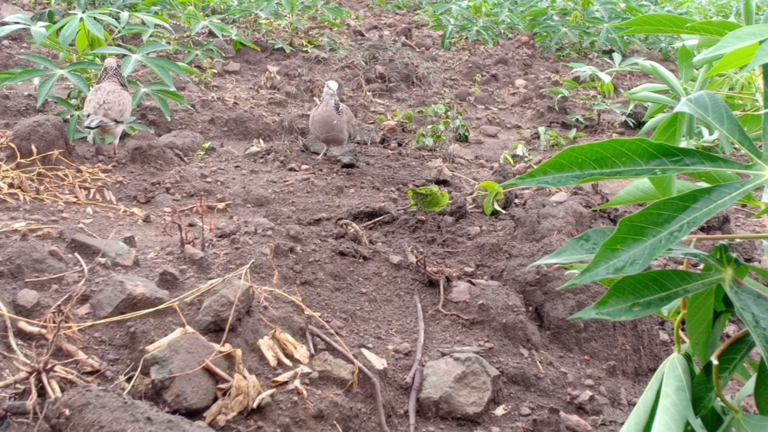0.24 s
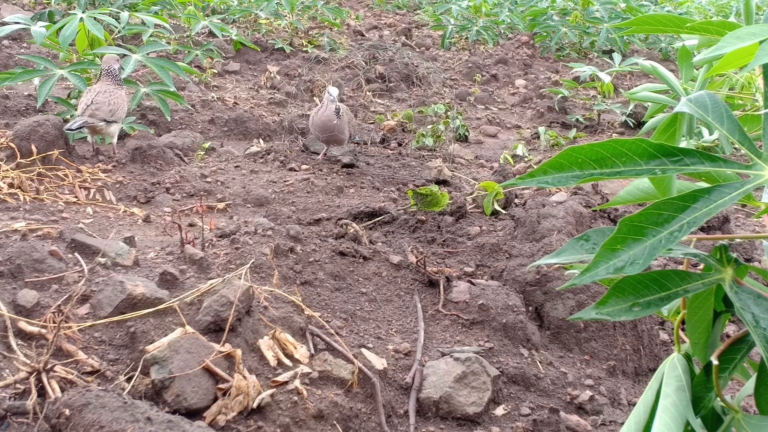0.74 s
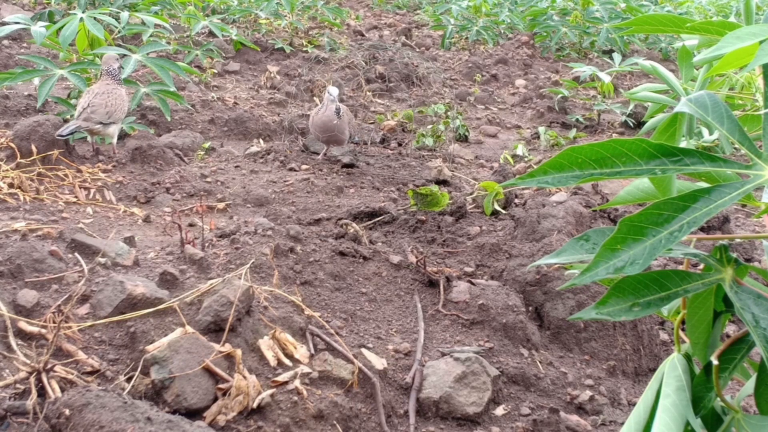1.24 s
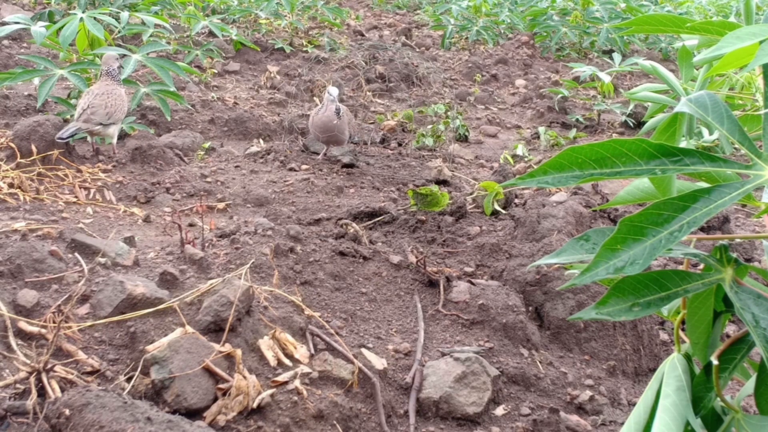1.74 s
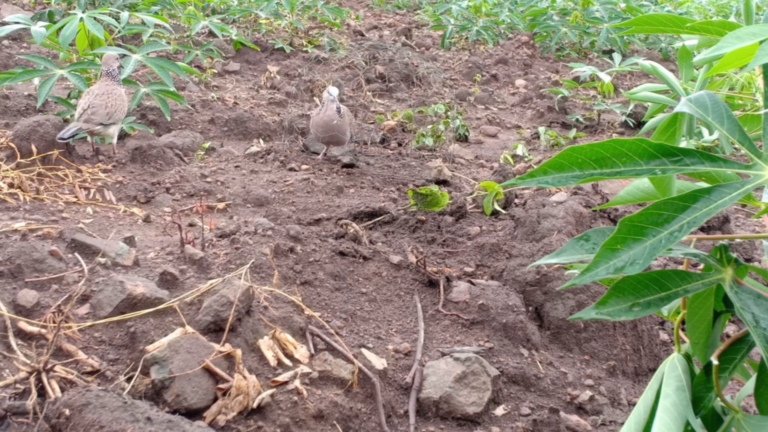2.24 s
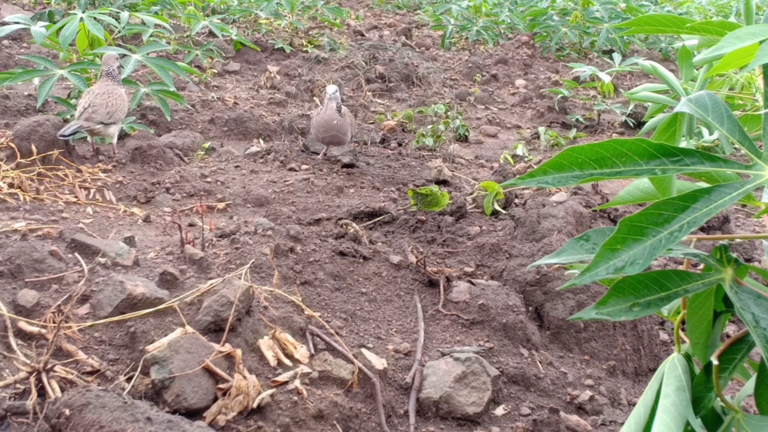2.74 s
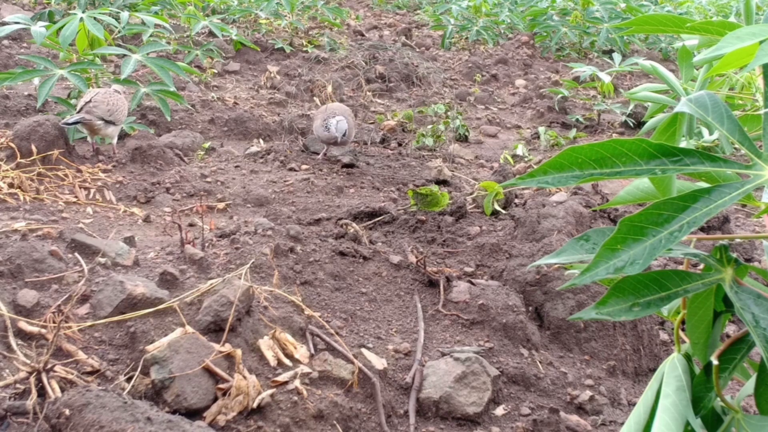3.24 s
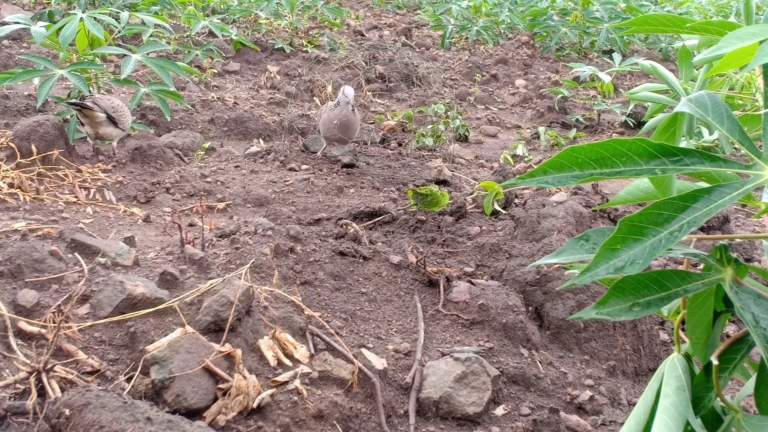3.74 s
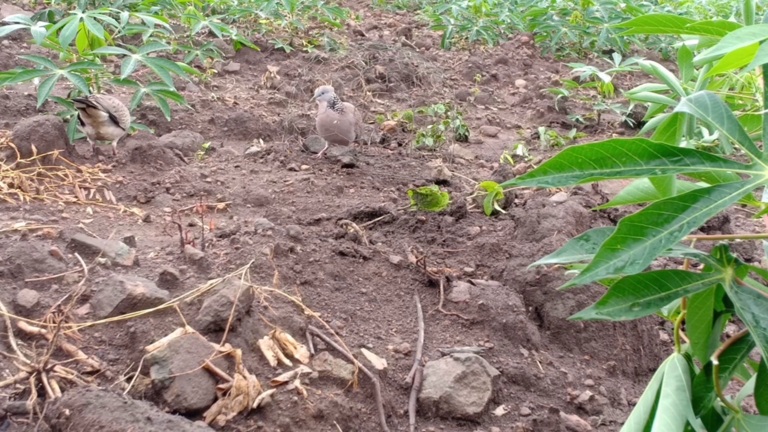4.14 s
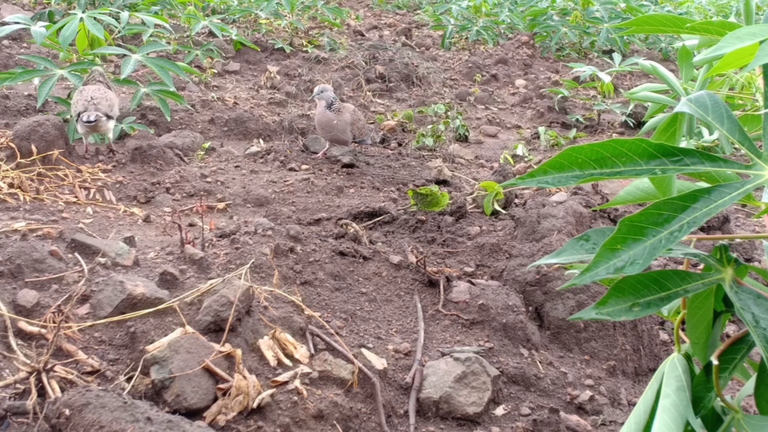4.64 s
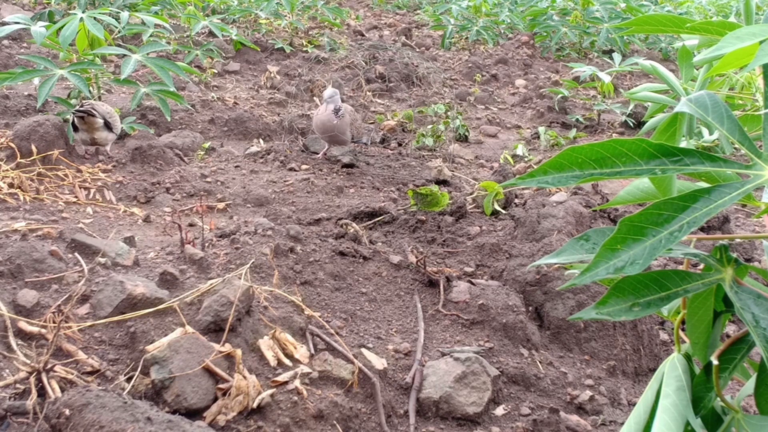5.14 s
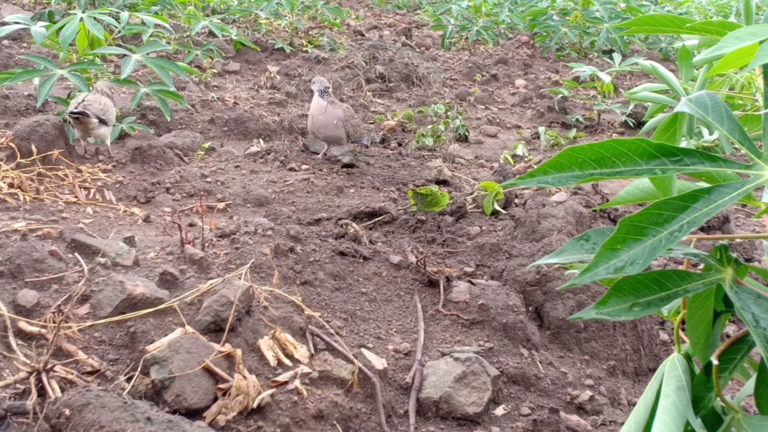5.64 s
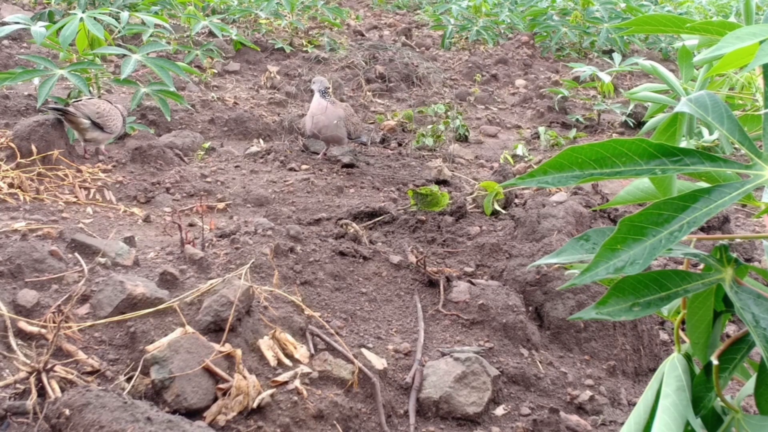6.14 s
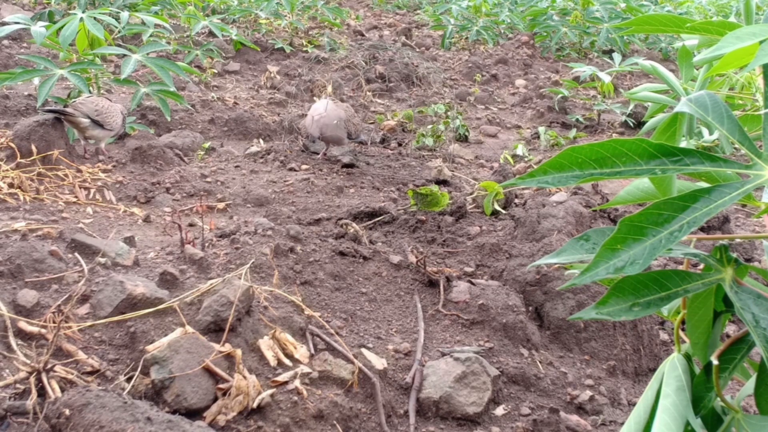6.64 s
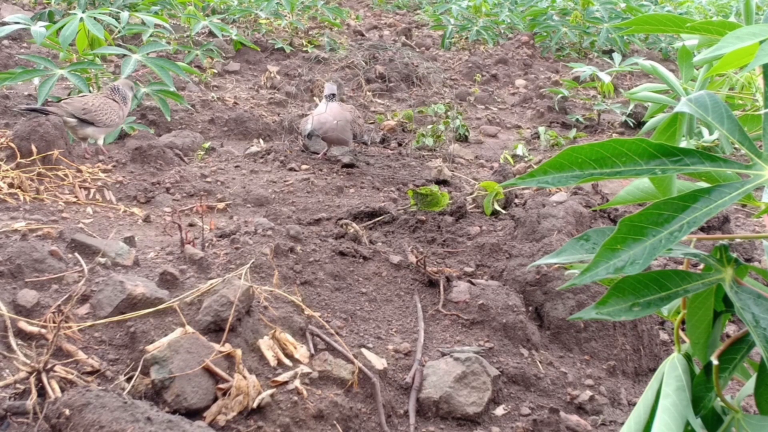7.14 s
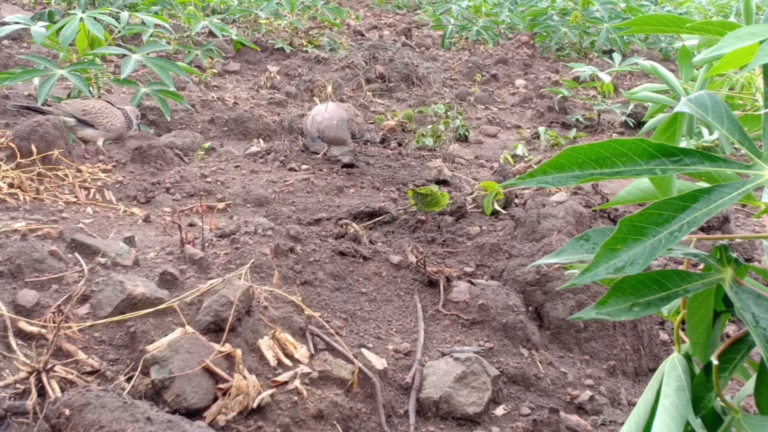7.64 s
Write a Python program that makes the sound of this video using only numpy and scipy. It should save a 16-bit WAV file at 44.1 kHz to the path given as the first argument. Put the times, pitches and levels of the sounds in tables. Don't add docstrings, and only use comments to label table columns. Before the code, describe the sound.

A dove a few metres away coos in purring short-long pairs over a quiet field, with falling chirps, high trills and faint insect rasps behind.

```python
import sys
import numpy as np
from scipy import signal
from scipy.fft import rfft, irfft
from scipy.io import wavfile
from scipy.ndimage import uniform_filter1d

SR = 44100
rng = np.random.default_rng(int(sys.argv[2]) if len(sys.argv) > 2 else 0)


def gain_from_decibels(decibels):
    exponent = np.asarray(decibels, float) / 20
    return 10 ** exponent


def generate_wav(sig):
    pcm = np.round(np.clip(np.atleast_2d(sig).T, -1, 1) * 32767).astype(np.int16)
    wavfile.write(sys.argv[1], SR, pcm)


N = 347949
t = np.arange(N) / SR


def band(x, lo_hz, hi_hz, order=2):
    return signal.sosfilt(signal.butter(order, [lo_hz, hi_hz], "band", fs=SR, output="sos"), x)


def unit(x):
    return x / np.sqrt(np.mean(x ** 2))


def walk(rate):
    hold = int(SR / rate)
    steps = np.repeat(rng.standard_normal(N // hold + 1), hold)
    return unit(uniform_filter1d(uniform_filter1d(steps, hold), hold)[:N])


def add(out, start, tone, pan_db, lead=0.):
    for ch, sign in enumerate((1, -1)):
        i = max(int((start - sign * lead / 2) * SR), 0)
        out[ch, i:i + len(tone)] += (tone * gain_from_decibels(sign * pan_db / 2))[:N - i]


def glide(s, hz, db):
    u = np.arange(s[0], s[-1], 1 / SR)
    phase = 2 * np.pi * np.cumsum(np.interp(u, s, hz)) / SR
    return np.sqrt(2) * gain_from_decibels(np.interp(u, s, db)) * np.sin(phase)


def leaves(x, t60, db):
    u = t[:SR // 2]
    tail = rng.standard_normal((2, len(u)))
    tail = tail * gain_from_decibels(2.3 * rng.standard_normal((2, len(u))))
    tail *= gain_from_decibels(-60 * u / t60) * (u > .004)
    tail /= np.sqrt(np.sum(tail ** 2, axis=1, keepdims=True))
    return x + gain_from_decibels(db) * signal.fftconvolve(x, tail, axes=1)[:, :N]


def soft_notes(notes, pan_db):
    out = np.zeros((2, N))
    for start, end, first_hz, last_hz, db in notes:
        share = np.array([0, .2, .8, 1])
        hz = first_hz + (last_hz - first_hz) * share
        add(out, start, glide((end - start) * share, hz, db + np.array([0.0, 2.5, 3.5, -14.5])), pan_db)
    return out


def coo_controls():
    # start in seconds, length in seconds, level in dB, first and last crop resonance in Hz.
    short_coos = [
        (3.716, 0.21, -32.5, 668, 617),
        (4.846, 0.22, -31, 655.6, 672.6),
        (6.058, 0.221, -31, 656, 659),
        (7.266, 0.21, -31.5, 657.5, 650),
    ]
    # start in seconds, length in seconds, level in dB, crop resonance in Hz,
    # seconds after the start at which the purr quickens.
    long_coos = [
        (-.29, 0.5, -30.5, 669, 0.13),
        (4.052, 0.52, -31, 661.7, 0.15),
        (5.185, .528, -31.5, 668.3, .15),
        (6.39, 0.49, -32, 668, .16),
        (7.589, 0.48, -32, 663.6, 0.085),
    ]
    # share of the length, level in dB, resonance shift in Hz.
    short_shape = [(0, -21.5, 0), (0.089, -1, 2.5), (.35, 0, 6.5), (.9, -1, -0.5), (0.998, -15, -20)]
    # share of the length, level in dB, resonance shift in Hz.
    long_shape = [(0, -17.5, -4.5), (.045, 0.5, 0.5), (0.148, 0, 4), (0.661, 0, -4.5), (.74, -0.5, -32),
                  (.88, -3.5, -51.5), (.965, -7, -63), (0.999, -8.5, -61)]
    short_purr_hz, slow_purr_hz, fast_purr_hz, quicken_s = 96.45, 67.66, 110.24, 0.094

    share, shape_db, shift = np.transpose(short_shape)
    for start, length, db, first_hz, last_hz in short_coos:
        s = start + length * share
        crop_hz = np.interp(t, s, first_hz + (last_hz - first_hz) * share + shift)
        yield s, np.interp(t, s, db + shape_db), crop_hz, short_purr_hz + 0 * t
    share, shape_db, shift = np.transpose(long_shape)
    for start, length, db, hz, quickens in long_coos:
        s = start + length * share
        rate = np.interp(t - start - quickens, [-quicken_s / 2, quicken_s / 2], [slow_purr_hz, fast_purr_hz])
        yield s, np.interp(t, s, db + shape_db), np.interp(t, s, hz + shift), rate


def dove():
    # middle in seconds, length in seconds, strength from 0 to 1.
    clear_moments = [(.035, .1, .85), (3.895, .03, .5), (4.295, .02, .9), (4.385, .038, 1),
                     (5.025, .06, .7), (5.355, .03, .6), (5.44, .022, .7), (5.475, .035, .9),
                     (5.54, .05, 1), (6.24, .04, .7), (6.572, .022, .7), (6.622, .05, .9),
                     (6.668, .022, .7), (7.44, .04, .7), (7.812, .035, .75), (7.87, .075, 1)]
    clear_db, clear_edge_s, clear_narrows, clear_wander_hz = 3, 0.0074, 0.34, 16
    crop_width_hz, between_lines = 56.9, .55
    scoop_hz, short_sag_hz, long_sag_hz, pitch_wander_hz = 190, 90, 20, 4
    purr_jitter, purr_stumble, pulse_rise, pulse_scatter_db = 0.1267, .06, .2, .7
    skirt_db, skirt_fall_db, skirt_tilt_db, short_skirt_db = -18, 6.5, .5, 6
    breath_db = -34.5

    out = np.zeros((2, N))
    wobble, drift, slip = walk(120), walk(140), walk(70)
    wander, stumble, scatter = walk(50), walk(45), walk(80)
    breath = unit(band(rng.standard_normal(N), 680, 930))
    flicker = np.array([walk(130) for _ in range(8)])
    clearing = np.zeros(N)
    for middle, length, strength in clear_moments:
        clearing += strength * np.clip((length / 2 - abs(t - middle)) / clear_edge_s + .5, 0, 1)
    clearing = np.clip(clearing, 0, 1)

    for s, *controls in coo_controls():
        i = slice(max(int(s[0] * SR), 0), min(int(s[-1] * SR), N))
        db, crop_hz, rate, clear = (c[i] for c in (*controls, clearing))
        since, until = t[i] - s[0], s[-1] - t[i]
        short = s[-1] - s[0] < .3
        centre = -between_lines * (1 - clear)
        width = crop_width_hz / rate * (1 - clear_narrows * clear)
        hz = crop_hz - centre * rate - scoop_hz * np.exp(-since / .014)
        hz -= (short_sag_hz if short else long_sag_hz) * np.exp(-until / .01)
        hz += 8 * drift[i] + (pitch_wander_hz + clear_wander_hz * clear) * wander[i]
        top = 2 * np.pi * np.cumsum(hz) / SR
        uneven_rate = rate * (1 + purr_jitter * wobble[i] + purr_stumble * stumble[i])
        purr = 2 * np.pi * (np.cumsum(uneven_rate) / SR + 0.29)
        k = np.arange(-4, 4)[:, None]
        share = np.exp(-(k - centre - .12 * slip[i]) ** 2 / (2 * (1.25 * width - .06) ** 2))
        skirt = skirt_db - skirt_fall_db * abs(k - centre) * rate / 100
        skirt = skirt + short_skirt_db * short - skirt_tilt_db * k
        share = (share + gain_from_decibels(skirt)) * (1 + .18 * flicker[:, i])
        beat = np.sum(share * np.exp(1j * k * (purr - pulse_rise * k)), axis=0)
        beat /= np.sqrt(np.sum(share ** 2, axis=0))
        beat *= 2.52 * np.tanh(abs(beat) / 1.156) / (abs(beat) + 1e-9)
        voice = np.imag(beat * np.exp(1j * top)) + gain_from_decibels(breath_db) * breath[i] * abs(beat)
        soft = np.clip(np.minimum(since / .004, until / .01), 0, 1)
        level = gain_from_decibels(db + clear_db * clear + pulse_scatter_db * scatter[i])
        add(out, max(s[0], 0), voice * level * soft, -5)
    return leaves(band(out, 410, 1700, order=3), 0.38, -20)


def air():
    # frequency in
    # Hz, level in dB per Hz.
    air_colour = [(20, -26), (50, -22.5), (120, -14.5), (250, -19.5), (600, -18.5), (1100, -25.5),
                  (1600, -24.5), (2600, -21.5),
                  (4000, -33), (5300, -31.5), (6100, -28.5), (7200, -40.5), (9500, -44.5), (13000, -40.5),
                   (15400, -47)]
    # time in seconds, level in dB.
    twitter_levels = [
        (0.0, -70.5),
        (1.71, -68.5),
        (4.88, -78),
        (7.34, -63.5),
        (7.89, -68),
    ]
    hz = np.fft.rfftfreq(N, 1 / SR) + 1
    colour_hz, colour_db = np.transpose(air_colour)
    colour = gain_from_decibels(np.interp(np.log(hz), np.log(colour_hz), colour_db))
    like = 0.49 / (1 + (hz / 450) ** 3)
    mid, side = rfft(rng.standard_normal((2, N))) * colour
    hush = irfft(mid * np.sqrt(1 + like) + side * np.sqrt(1 - like) * np.array([[1], [-1]]), N)
    twitter = np.zeros((2, N))
    for lo_hz in (1890, 2190, 2400, 2660, 3000):
        voices = unit(band(rng.standard_normal((2, N)), lo_hz, lo_hz * 1.12))
        twitter += voices * gain_from_decibels(3.4 * walk(20))
    twitter_db = np.interp(t, *np.transpose(twitter_levels)) - 10 + np.array([[-2], [2]])
    return unit(hush) * gain_from_decibels(-61.5 + np.array([[-1], [1]])) + twitter * gain_from_decibels(twitter_db)


def cricket():
    # start in seconds, end in seconds, level in dB.
    bursts = [(0.104, .2, -76), (0.427, 0.546, -75), (0.741, .83, -75), (1.226, 1.4, -78),
              (1.574, 1.672, -76.5), (2.464, 2.61, -76.5), (2.793, 2.91, -73), (3.13, 3.327, -75),
              (3.503, 3.6, -75), (3.844, 3.94, -75), (4.42, 4.566, -76.5), (4.732, 4.832, -76),
              (5.289, 5.437, -76), (5.644, 5.714, -75.5), (5.918, 6.038, -76.5), (6.407, 6.606, -76),
              (6.74, 6.86, -75.5), (7.1, 7.2, -73), (7.424, 7.537, -73.5)]
    throb = 1 + 0.16 * np.sin(2 * np.pi * 65 * t)
    rasp = unit(band(rng.standard_normal(N), 4780, 5000) * throb)
    gate = np.zeros(N)
    for start, end, db in bursts:
        edges = [start - .015, start + .015, end - .015, end + 0.026]
        gate += gain_from_decibels(db) * np.interp(t, edges, [0, 1, 1, 0])
    return rasp * gate * gain_from_decibels(np.array([[-2.5], [2.5]]))


def run_of(first, last, gap, db):
    s = np.linspace(first, last, max(round((last - first) / gap), 1) + 1)
    return list(zip(s, db + 1.4 * rng.standard_normal(16)[:len(s)]))


def warble(notes, hz, sweep_hz, length, pan_db):
    out = np.zeros((2, N))
    for start, peak_db in notes:
        force = np.clip((peak_db + 67.5) / 12, .2, 1)
        s = length * (1 + force) * np.array([0, .3, .7, 1])
        pitch_hz = hz + sweep_hz * force * np.array([1.0, .4, -0.51, -2.4])
        note_db = peak_db - 5.5 + np.array([-12.5, -1.0, -2.5, -27.5])
        add(out, start - .006, glide(s, pitch_hz, note_db), pan_db, lead=.0006)
    return out


def warbler():
    # first quick note, first loud note and last loud note in seconds, level in dB.
    songs = [
        (.338, .768, .9987, -55),
        (2.4157, 2.745, 2.9762, -54.5),
        (4.2377, 4.615, 4.8476, -54),
        (6.0087, 6.4293, 6.6483, -54.5),
    ]
    # first note and last note in seconds, level in dB.
    far_runs = [(.11, .2, -63), (1.115, 1.52, -62), (1.91, 1.98, -63), (2.32, 2.41, -62.5),
                (3.19, 3.47, -61.5), (3.58, 3.68, -63), (3.914, 4, -63), (5.009, 5.096, -65),
                (5.253, 5.545, -62), (5.925, 5.99, -65), (6.7, 6.77, -65), (7.06, 7.15, -63.5),
                (7.279, 7.34, -66), (7.476, 7.86, -62)]
    quick_gap_s, quick_db, break_s, far_gap_s = .046, -5.5, .055, .066
    near, far = [], []
    for first, loud, last, db in songs:
        near += run_of(first, loud - break_s, quick_gap_s, db + quick_db)
        near += [(s, db) for s in np.linspace(loud, last, 4)]
    for first, last, db in far_runs:
        far += run_of(first, last, far_gap_s, db)
    far = warble(far, 5850, 800, .026, -4) * gain_from_decibels(-5.5 + 4 * walk(400))
    return leaves(warble(near, 6013, 330, .013, -14.0), 0.15, -5.5) + leaves(far, 0.19, 7.9)


def chirper():
    # seconds from onset, pitch in Hz, level in dB.
    chirp_shape = [(-.013, 3300, -19), (-.006, 2950, -6), (.003, 2680, -1), (.019, 2290, 0),
                   (.03, 1960, -13), (.042, 1680, -14), (.06, 1645, -13), (.072, 1635, -32)]
    # time in seconds, peak in dB, left minus right in dB, strength of the low end in dB.
    chirps = [(0.2625, -47, -3, -7), (0.601, -47.5, -8, -2.5), (0.9348, -44, -7, -2),
              (1.259, -41.5, -7, -6), (1.5877, -42.5, -4, -1.5), (1.9222, -40.5, -6.5, -6.5),
              (3.695, -53.5, -2, -6), (4.0613, -55.5, -4.5, -4), (5.642, -56.5, -4.5, -2),
              (5.965, -51, -8.5, 1.5), (6.2856, -43.5, -7.5, 1.5), (6.6158, -45.5, -8, 4),
              (6.952, -43, -5, 2), (7.2882, -44.5, -6, 2)]
    out = np.zeros((2, N))
    s, hz, db = np.transpose(chirp_shape)
    for start, peak_db, pan_db, low_db in chirps:
        chirp = glide(s, hz, peak_db - 1.5 + db + low_db * (hz < 1800))
        add(out, start + s[0], chirp, pan_db, lead=0.0005)
    return leaves(out * gain_from_decibels(2.2 * walk(150) - 1), .33, -1.5)


def far_doves():
    # start in seconds, end in seconds, first pitch in Hz, last pitch in Hz, level in dB.
    far_coos = [
        (.4, 0.536, 536, 436, -64),
        (.56, .63, 508, 475, -69),
        (.8, 1.01, 808, 738, -77.5),
        (2.55, 2.63, 492, 526, -74),
        (4.79, 4.891, 482, 534, -66.5),
        (5.09, 5.221, 543, 466, -66),
        (5.73, 5.89, 493, 444, -71.5),
    ]
    return leaves(soft_notes(far_coos, -5), .25, -4)


def whistlers():
    # start in seconds, end in seconds, first pitch in Hz, last pitch in Hz, level in dB. # The first
    whistles = [(2.653, 2.703, 2950, 1850, -69.5), (2.81, 2.87, 3800, 3480, -75.5),
                (3.012, 3.053, 2950, 1820, -66), (3.356, 3.412, 2950, 1790, -67),
                (.7, 0.742, 3100, 3330, -71), (1.091, 1.174, 3200, 3430, -70.5),
                (1.322, 1.35, 3600, 3460, -76), (1.44, 1.582, 3185, 3156, -66),
                (1.706, 1.768, 3145, 2955, -67), (2.072, 2.099, 2400, 2400, -64.5),
                (2.198, 2.364, 3350, 3420, -82), (2.261, 2.327, 2920, 2860, -71),
                (2.584, 2.703, 3560, 3190, -74), (2.963, 3.175, 3000, 3050, -66.5),
                (3.16, 3.26, 3000, 3000, -75), (3.26, 3.38, 3390, 2850, -72),
                (3.464, 3.611, 2720, 2887, -71), (3.76, 3.825, 2450, 2505, -72),
                (3.916, 4.061, 2050, 2155, -78), (5.15, 5.169, 2400, 2310, -71.5),
                (5.483, 5.514, 2426, 2250, -69), (5.82, 5.854, 2580, 2360, -72.5),
                (7.28, 7.365, 3200, 3440, -72)]
    return leaves(soft_notes(whistles, -9.5), .25, -4)


def ticks():
    # time in seconds, peak in dB, left minus right in dB.
    leaf_ticks = [
        (1.0081, -60, -2),
        (1.06, -62, -9),
        (1.5838, -67, -16),
        (1.8018, -62.5, -7.5),
        (2.2792, -65, -16.5),
        (2.578, -65, -14.5),
        (5.4833, -62, -8.5),
        (5.7635, -60, -6),
        (5.9834, -65, -3.5),
    ]
    out = np.zeros((2, N))
    bursts = rng.standard_normal((len(leaf_ticks), 300)) * np.exp(-t[:300] / 0.0022)
    snaps = band(bursts, 2500, 5900)
    for (start, peak_db, pan_db), snap in zip(leaf_ticks, snaps):
        add(out, start, snap / np.max(abs(snap)) * gain_from_decibels(peak_db + 9.5), pan_db)
    return out


def chatterers():
    # middle in seconds, top pitch in Hz, level in dB.
    flicks = [
        (2.39, 4650, -69),
        (2.63, 4550, -68),
        (2.86, 4300, -74),
        (3.07, 4600, -70),
        (3.28, 4500, -74),
    ]
    # time in seconds, peak in dB, pitch in Hz.
    chatter = [(6.3973, -58, 4150), (6.4868, -55.5, 4090), (6.5489, -57, 3740), (6.614, -53.5, 3630),
               (6.643, -58, 3760), (6.9014, -58, 3850), (6.988, -54, 3770), (7.0577, -58, 3780),
               (7.1136, -56, 3800), (7.174, -56, 3770), (7.394, -53, 4500), (7.5137, -55, 3590),
               (7.58, -52.5, 3770), (7.619, -51.5, 4430), (7.6958, -54.5, 3650), (7.83, -50.5, 4390)]
    out = np.zeros((2, N))
    flock = []
    for note in chatter * 2:
        flock.append(np.add(note, [.03, 0, 180] * rng.standard_normal(3) + [0, -4.5, 0]))
    for start, peak_db, hz in chatter + flock:
        pitch_hz = hz * np.array([1.06, 1.015, .985, .94])
        note_db = peak_db + np.array([-28, -17, -18, -28])
        add(out, start - .004, glide(np.array([0, .008, .02, .03]), pitch_hz, note_db), -5)
    for middle, top_hz, db in flicks:
        pitch_hz = top_hz * np.array([.72, 1, 1, .62])
        note_db = db + np.array([-12, -4, -4, -9])
        add(out, middle - .03, glide(np.array([0, .025, .035, .065]), pitch_hz, note_db), -5)
    return leaves(out * gain_from_decibels(4 * walk(300)), .25, 0)


def scene():
    birds = dove() + chirper() + warbler() + far_doves() + whistlers() + chatterers()
    return birds + cricket() + ticks() + air()


def low_pass(x):
    return signal.sosfilt(signal.butter(12, 15480, fs=SR, output="sos"), x)


def record(dry):
    mix = dry + .001
    return low_pass(mix)


dry = scene()
out = record(dry)
generate_wav(out)
```